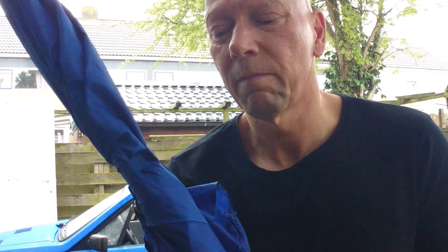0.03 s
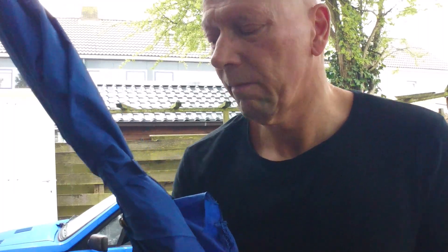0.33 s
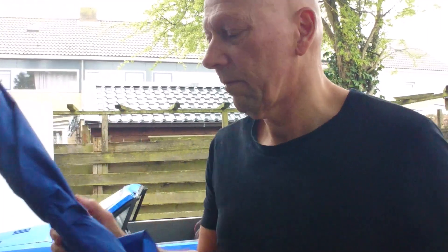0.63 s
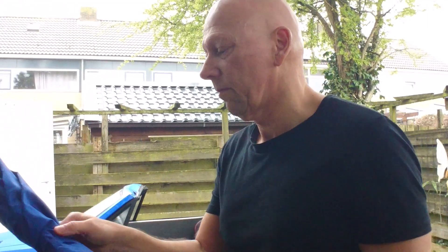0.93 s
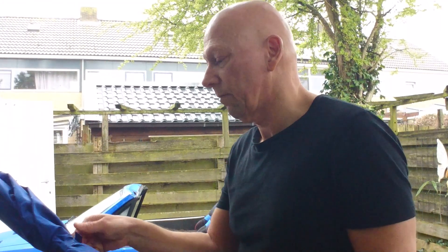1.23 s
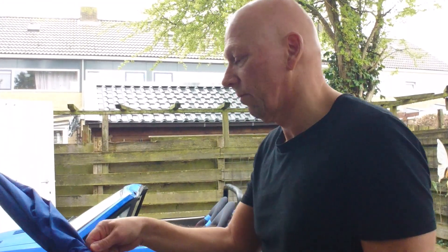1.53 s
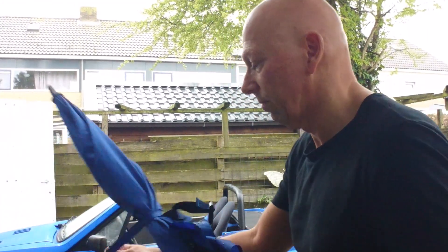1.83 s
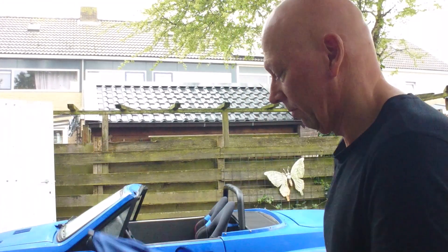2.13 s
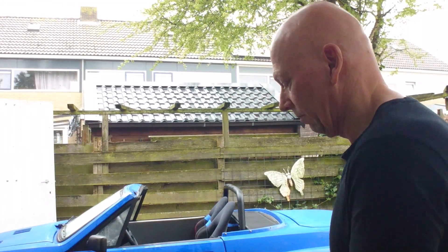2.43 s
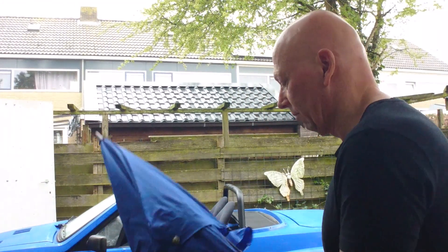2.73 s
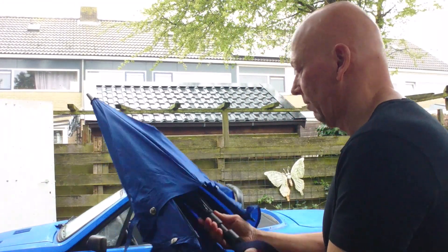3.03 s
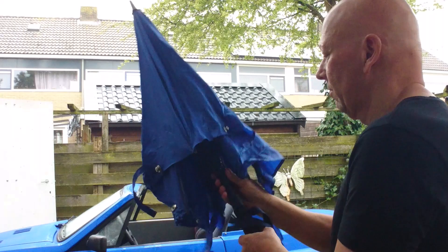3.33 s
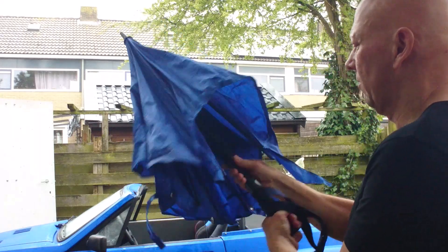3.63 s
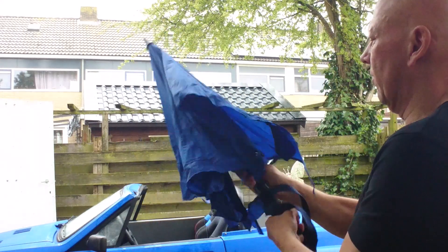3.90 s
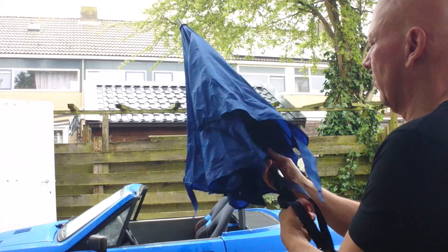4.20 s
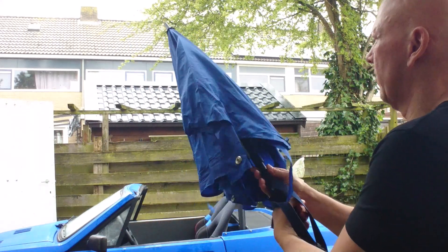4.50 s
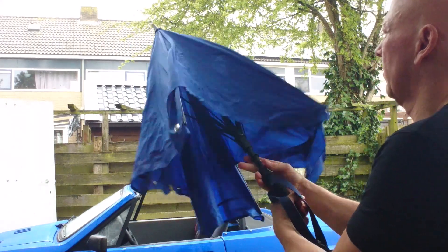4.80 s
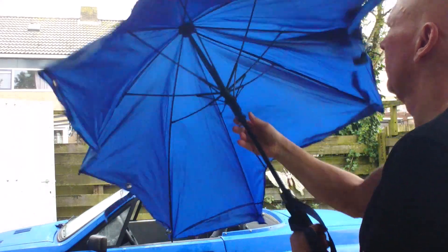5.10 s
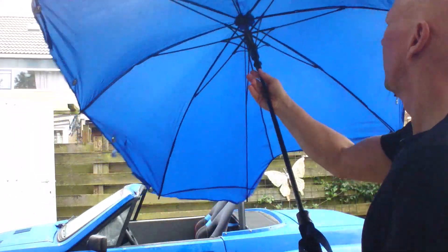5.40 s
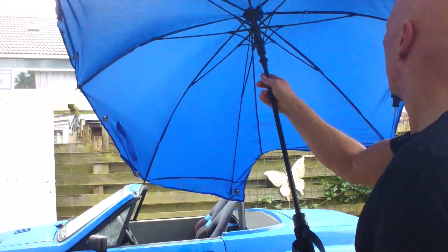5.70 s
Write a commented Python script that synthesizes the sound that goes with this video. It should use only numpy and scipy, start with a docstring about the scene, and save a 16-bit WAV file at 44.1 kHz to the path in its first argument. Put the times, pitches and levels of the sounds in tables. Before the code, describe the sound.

Over faint distant traffic, an umbrella clicks and clangs, its hook-and-loop strap tears free, and the nylon swishes until it snaps taut.

```python
"""Traffic drones far from a fenced garden. Close by, a little to the right, someone opens a big umbrella.
First come small clicks and a soft thump. The metal shaft is knocked and clangs twice, while the cloth
starts to rustle. The hook-and-loop strap rips loose, and the nylon swishes and flaps as it is shaken out
and spread. At last the slider latches on the shaft and the cloth snaps tight with a thump."""
import sys
import numpy as np
from scipy import signal
from scipy.fft import rfft, irfft, next_fast_len
from scipy.io import wavfile
from scipy.ndimage import map_coordinates

SR = 44100
rng = np.random.default_rng(int(sys.argv[2]) if len(sys.argv) > 2 else 0)


def wrap_up_sound(samples):
    """Save the sound to the file named by the first command line argument, as 16-bit audio."""
    columns = np.atleast_2d(samples).T
    # keep every value between -1 and 1, then stretch to whole-number steps
    tamed = np.clip(columns, -1, 1)
    steps = np.round(tamed * 32767).astype(np.int16)
    wavfile.write(sys.argv[1], SR, steps)


N = 253575

# A "fade" is the time to die away by 60 dB. "Pan" is left minus right, so below zero is to the right.
# How strong each noise is from low to high pitch: f/Hz, level/dB
RUMBLE_TONE = [(25, -31.5), (50, -4), (78, 5.5), (110, -5.5), (170, -7), (250, -20), (500, -31),
               (1000, -35.5)]  # far roads and stirred air
AIR_TONE = [(60, -12.5), (120, -9.5), (250, -18.5), (500, -23), (1000, -24.5), (2000, -33), (4500, -30.5),
            (7000, -48.5), (13500, -31), (16000, -45.5)]  # faint outdoor hiss
RATTLE_TONE = [(250, -31.5), (600, -5), (1400, -0.5), (2300, -1), (3300, -3), (4500, 0), (7000, -2.5),
               (10000, -1.5), (13500, 0), (16000, -4.5)]  # loose ribs after a click
CLATTER_TONE = [(70, -23.5), (150, -13), (320, -13), (450, -25), (680, -18.5), (950, -14.5), (1350, -15),
                (2000, -6.5), (3100, -10), (4600, -4), (7000, -15), (11000, -14), (13000, -8), (16000, -19)]  # ribs bouncing on the shaft
SWISH_TONE = [(300, -28), (900, -7.5), (1800, -1.5), (3000, 0), (4500, 1.5), (5800, 0.5), (7000, -4.5),
              (9000, -10.5), (16000, -18)]  # nylon sliding on nylon
HISS_TONE = [(3000, -39), (6500, -5.5), (9000, -6), (12000, -2.5), (13200, 0.5), (14500, -1), (16000, -4.5)]  # fine hiss of the weave
FLAP_TONE = [(90, 1), (180, -4.5), (350, 1), (500, -0.5), (700, -1.5), (1200, -4.5), (2200, -14),
             (5000, -42.5)]  # folds filling with air
STRAP_TONE = [(250, -23), (500, -14), (820, -14), (1000, -3.5), (1300, -8), (1600, -8), (2200, -10),
              (3500, -7), (5500, -6), (9000, -9), (13500, -4.5), (16000, -12)]  # hooks tearing loose
# Where the sounds sit between the ears: f/Hz, pan/dB
FAR_PAN = [(50, -1.5), (150, -10), (1000, -9), (6000, -3.5), (14000, -6.5)]
NEAR_PAN = [(60, -5.5), (200, -7), (700, -6.5), (1300, -7), (2400, -5), (4400, -1.5), (8000, -2.5),
            (11000, 1.5), (13200, 3), (15500, 2.5)]
CLATTER_PAN = [(100, -11), (200, -13.5), (380, -13.5), (700, -4.5), (1300, -9), (2400, -4.5), (4400, -2),
               (8000, -2), (13500, 4)]
# How alike a noise is in both ears: f/Hz, likeness (1 = the same)
LIKENESS = [(60, 0.9), (130, 0.75), (290, 0.67), (640, 0.59), (1410, 0.26), (3100, 0.052), (6820, 0.014),
            (15000, -0.086)]
# A far motor growing louder: t/s, f/Hz, level/dB
MOTOR_PATH = [(0, 169, -81.5), (3.2, 171.7, -73.5), (4.2, 178.7, -67), (4.8, 179, -60.5), (5.75, 178, -58)]
# The tones in its hum: multiple of the pitch, level/dB
MOTOR_TONES = [(1, 3.5), (2, -13), (3, -29), (4, -11)]
# Clicks of slider, rib tips and folds: t/s, level/dB, f/Hz, width/octaves, fade/s, rattle offset/dB
CLICKS = [(0.3405, -47, 14000, 0.23, .009, -12), (0.456, -45, 4100, 1.5, .017, -15),
          (0.461, -53, 1870, 0.15, 0.035, -15), (0.478, -42, 1850, .3, .02, -16),
          (1.089, -23, 14000, 1.3, 0.0027, -20), (1.092, -29, 9750, 5.5, 0.0051, -7),
          (1.175, -47, 2200, 1.5, 0.023, -8), (1.516, -29, 11000, 2.5, 0.0046, -7),
          (1.574, -35, 12000, 2.5, 0.0041, -12), (2.7507, -37, 13600, 0.45, .0055, -17),
          (2.831, -40, 4700, 0.71, 0.0098, -20), (3.8585, -14.5, 2300, 1.1, 0.0037, -15),
          (4.599, -32.5, 2540, 0.39, 0.013, -20), (5.169, -39.5, 368, 0.5, 0.035, -25),
          (5.2412, -29, 9000, 1.4, 0.0057, -14), (5.265, -33, 5060, 1.7, 0.0093, -6),
          (5.3168, -36.5, 1000, 2.5, .012, -5), (5.4996, -22.5, 2300, 1.1, 0.017, -13),
          (5.5103, -29, 3484, 0.67, 0.025, -11), (5.545, -38.5, 704, 1.5, 0.018, -15)]
# Jolts to the cloth: t/s, level/dB, rise/s
JOLTS = [(0.46, -10.5, 0.011), (1.173, -9.5, 0.07), (1.279, -9, 0.052), (1.325, -29, 0.064),
         (4.384, -18, 0.037), (5.503, -3.5, 0.0042)]
# The cloth's drum-like tones: f/Hz, level/dB, fade/s, pan/dB
CLOTH_TONES = [(53, -22, 0.19, -5), (83.6, -25, 0.15, -1), (114, -24.5, 0.08, -14), (180, -40.5, 0.14, -11),
               (260, -35, 0.088, -7), (327.5, -38.5, 0.12, -10)]
# Knocks on the shaft: t/s, clatter level/dB, clatter hold/s, clatter fade/s, ring level/dB, grip (0-1)
KNOCKS = [(0.577, -15, 0.012, 0.15, 1.5, 0), (1.4545, -26.5, 0.0038, 0.15, -9, 1)]
# Ringing tones of shaft and frame: f/Hz, level/dB, fade/s, pan/dB, change under a firm grip/dB
SHAFT_TONES = [(62, -38, .35, 0, 0), (103, -31, .2, -3, -8), (188, -46, .2, -16, -1),
               (262, -46, .26, -15, 0), (305, -43, .22, -16, 0), (339, -37, .13, -18, 6),
               (385, -54, .1, -14, 16), (480, -55, .11, -8, 17), (535, -56, .1, 5, 16),
               (850, -49, .08, -10, 8), (1130, -44, .08, -14, 3), (1599, -38.5, .33, -12, -6),
               (1943, -28.5, .29, -7, -1), (2333, -27.5, .35, -13, -4.5), (2804, -31, .11, -3, -8),
               (2854, -21, .13, -3, -8), (3610, -35.5, .56, -9, -16), (3858, -31, .14, -2, -8),
               (4143, -28, .12, 0, -7), (4297, -17, .12, 0, -3.5), (4927, -32, .12, -4, -4),
               (5178, -28, .125, -3, -7), (7900, -33, .14, 0, -10), (9372, -33, .18, 3, -6)]
# Swings of the umbrella: t/s, level/dB, rise/s, hold/s, fade/s
SWINGS = [(0.6, -50, 0.053, 0.14, .8), (1.12, -51, 0.061, 0.39, 0.68), (1.61, -47.5, 0.064, .03, 2.6),
          (2.41, -51, 0.036, .01, .5), (4.31, -45, .09, .17, 1.1), (4.67, -40.5, .09, .04, 1.4),
          (5.25, -46, 0.085, .01, .35), (5.52, -53.5, .1, .15, 1)]
# Movements of the cloth: t/s, level/dB, rise/s, hold/s, fade/s, hiss offset/dB, flap offset/dB
CLOTH_MOVES = [(0.95, -63, 0.045, 0.16, 0.66, -0.5, -9.5), (1.15, -59.5, 0.025, 0.022, 0.2, 1, -1.5),
               (1.268, -67, 0.012, 0.042, .4, 2, -1), (1.688, -58.5, 0.018, 0.12, 1.24, -0.5, -5),
               (1.937, -47.5, 0.029, 0.011, 0.75, -1, -12), (2.109, -49.5, 0.062, .01, .5, -1, -8),
               (2.22, -53, 0.043, 0.12, 0.78, 1, -5.5), (2.391, -47.5, 0.036, .01, 0.52, -2.5, -10),
               (2.498, -49, .1, 0.036, 0.74, -1, -7.5), (2.788, -55, 0.044, 0.12, 0.47, -0.5, -9),
               (3.018, -58, .08, 0.12, 1.2, -2.5, -6.5), (3.231, -54, 0.028, 0.022, 2.36, 0, -11),
               (3.49, -65.5, .05, .03, 1.6, -3, -4.5), (3.698, -51, 0.083, 0.14, 1.5, 1, -11.5),
               (3.928, -51, 0.037, 0.022, 1.13, 0.5, -5.5), (4.1, -56.5, 0.026, 0.034, .7, -1.5, -10),
               (4.268, -57, 0.064, 0.045, 1.4, -3, -3.5), (4.593, -53.5, 0.023, .13, 0.65, -2, -11),
               (4.682, -46.5, 0.29, 0.059, 0.95, 2, -15.5), (5.038, -50.5, 0.089, 0.058, 1.4, 1, -3),
               (5.246, -40, 0.027, 0.0059, 0.16, 2, -5), (5.29, -45.5, 0.024, 0.02, 0.39, 0.5, 0.5),
               (5.498, -63.5, 0.012, 0.043, 0.49, -5, 5.5), (5.59, -70, 0.025, 0.018, .7, -1, 8.5)]
# Bunches of hooks letting go: t/s, level/dB
HOOK_BURSTS = [(1.592, -30.5), (1.607, -38), (1.618, -30), (1.637, -37), (1.6463, -28.5), (1.657, -26.5),
               (1.661, -27.5), (1.666, -28), (1.673, -27), (1.680, -28)]
# How long the garden echoes: f/Hz, fade/s
ECHO_FADES = [(200, 0.68), (2000, 0.43), (6000, 0.4), (14000, 0.36)]

PING_DB, PING_DB_PER_OCTAVE = -0.5, -8.5  # the wider a click's range of pitches, the less it pings
PULL_START_S, PULL_FREE_S = 1.585, 1.685  # the strap is pulled ever harder until it comes free
PULL_DB, PULL_GROWS_DB_PER_S, PULL_FADE_S = -34, 150, 0.065  # its rasp: peak, growth, dying away
TOP_HZ = 15950


def amp(db):
    """Turn decibels into a number to multiply by."""
    return 10 ** (np.asarray(db) / 20)


def unit(x):
    """Scale a sound to an average power of 1."""
    return x / np.sqrt(np.mean(x ** 2) + 1e-20)


def along(points, hz):
    """Look up a table's value at any pitch."""
    f, v = np.transpose(points)
    return np.interp(np.log(hz + 1), np.log(f + 1), v)


def curves(rows):
    """Join a table's points in time: one curve for each later column."""
    s, *cols = np.transpose(rows)
    return [np.interp(np.arange(N) / SR, s, c) for c in cols]


def wobble(rate):
    """A smooth curve through `rate` random values a second."""
    return map_coordinates(rng.standard_normal(int(N * rate / SR) + 4), [np.arange(N) * rate / SR])


def filtered(x, response):
    """Turn each pitch in x up or down by response(hz)."""
    size = x.shape[-1]
    m = next_fast_len(size + 4096)
    return irfft(rfft(x, m) * response(np.fft.rfftfreq(m, 1 / SR)), m)[..., :size]


def sides(pan_db):
    """Left and right volume for a pan."""
    return amp(np.array([[.5], [-.5]]) * pan_db)


def rush(spectrum, pan, size=N, drive=1):
    """Stereo noise, alike in both ears in the bass but not in the treble; drive makes it rough."""
    def mix(hz):
        turn = np.arccos(np.clip(along(LIKENESS, hz), -1, 1)) / 2
        return amp(along(spectrum, hz)) * np.array([np.cos(turn), np.sin(turn)])
    mid, side = filtered(drive * rng.standard_normal((2, size)), mix)
    return unit(filtered(np.array([mid + side, mid - side]), lambda hz: sides(along(pan, hz))))


def fade(t, fade_s):
    """Die away by 60 dB in fade_s seconds."""
    return amp(-60 * t / max(fade_s, 1e-3))


def ring(t, hz, db, fade_s, pan_db, attack):
    """One dying tone; high tones are more out of step between the ears."""
    lag = np.array([[.5], [-.5]]) * min(hz / 1500, np.pi / 2)
    tone = np.sqrt(2) * np.sin(2 * np.pi * hz * t + lag)
    return amp(db) * sides(pan_db) * tone * fade(t, fade_s) * (1 - np.exp(-t / attack))


def add(track, s, sound):
    """Mix a sound in at time s."""
    part = track[:, round(s * SR):][:, :sound.shape[1]]
    part += sound[:, :part.shape[1]]


def traffic():
    """Far roads rumble under a low, wavering drone, the hum of one motor and a faint hiss of air."""
    motor_hz, motor_db = curves(MOTOR_PATH)
    turns = np.cumsum(motor_hz * (1 + 0.0083 * wobble(6.6))) / SR
    hum = unit(sum(amp(db) * np.sin(2 * np.pi * round(k) * turns) for k, db in MOTOR_TONES))
    motor = amp(motor_db + 2.5 * wobble(12)) * hum
    drone_hz = 53.5 + 1.9 * wobble(7.7)
    drone = amp(-60.5 + wobble(5.4)) * unit(np.sin(2 * np.pi * np.cumsum(drone_hz) / SR))
    roads = amp(-63) * rush(RUMBLE_TONE, FAR_PAN)
    air = amp(-62.5) * rush(AIR_TONE, FAR_PAN)
    return sides(-1.2) * drone + sides(-2.5) * motor + roads + air


def ribs(x, depth_db):
    """The many thin ribs make some high pitches louder and others softer."""
    grid = np.arange(0, SR / 2, 70)
    ripple = rng.standard_normal(len(grid)) * np.clip(grid / 3000, 0, 1)
    return filtered(x, lambda hz: amp(depth_db * np.interp(hz, grid, ripple)))


def clicks():
    """A small part snaps with a crack and a ping around one pitch, then the loose ribs rattle."""
    out, t = np.zeros((2, N)), np.arange(SR // 5) / SR
    grid = np.geomspace(40, SR / 2, num=60)
    for s, db, hz, octaves, fade_s, rattle_db in CLICKS:
        hump_db = -10 * np.log10(1 + (np.log2(grid / hz) / octaves) ** 4)  # loudest around hz
        noise = rush(np.column_stack([grid, hump_db]), NEAR_PAN, size=len(t))
        shape = fade(t, fade_s)
        crack = unit(shape * noise) * np.sqrt(np.mean(shape ** 2))
        ping_db = PING_DB + PING_DB_PER_OCTAVE * octaves
        ping = ring(t, hz, ping_db, fade_s, along(NEAR_PAN, hz), attack=.0001)
        rattle = unit(ribs(rush(RATTLE_TONE, NEAR_PAN, size=len(t)), depth_db=2.5))
        rattle_s = .17 if hz < 5000 else .04  # deep clicks shake the whole frame, bright ones one tip
        rattle *= amp(rattle_db) * (1 - np.exp(-t / 0.0014)) * fade(t, rattle_s)
        bass_cut = signal.butter(2, min(hz / 3, 700), "highpass", fs=SR)  # small parts give little bass
        add(out, s, amp(db) * signal.lfilter(*bass_cut, crack + ping + rattle))
    return out


def thumps():
    """A jolt makes the cloth boom like a slack drum."""
    out, t = np.zeros((2, N)), np.arange(SR // 2) / SR
    for s, db, rise in JOLTS:
        for hz, level, fade_s, pan in CLOTH_TONES:
            add(out, s, ring(t, hz, level + db, fade_s, pan, attack=rise))
    return out


def shaft_clangs():
    """Each knock bounces the ribs against the tube, which rings; a firm grip dulls its high tones."""
    out, t = np.zeros((2, N)), np.arange(SR * 3 // 4) / SR
    for s, db, hold, fade_s, ring_db, grip in KNOCKS:
        bounces = amp(1.24 * wobble(1194)[:len(t)])
        noise = rush(CLATTER_TONE, CLATTER_PAN, size=len(t), drive=bounces)
        shape = (1 - np.exp(-t / 0.002)) * fade(np.maximum(t - hold, 0), fade_s)
        clatter = amp(db) * shape * unit(ribs(noise, depth_db=3.5))
        tube = sum(ring(t, hz, level + ring_db + grip * change, ring_s, pan, attack=0.0027)
                   for hz, level, ring_s, pan, change in SHAFT_TONES)
        add(out, s, clatter + tube)
    return out


def swells(rows):
    """The loudness of overlapping movements: each rises smoothly, holds and dies away."""
    now, power = np.arange(N) / SR, np.full(N, amp(-180))
    for s, db, rise, hold, fade_s in rows:
        rising = np.sin(np.pi / 2 * np.clip((now - s) / rise, 0, 1))
        falling = fade(np.maximum(now - s - rise - hold, 0), fade_s)
        power += (amp(db) * rising * falling) ** 2
    return np.sqrt(power)


def swings():
    """Each swing of the umbrella pushes a low rumble of air past the listener."""
    return amp(-3) * swells(SWINGS) * rush(RUMBLE_TONE, FAR_PAN)


def cloth_rustle():
    """Folds slide over each other in countless tiny slips; wide folds flap as they fill with air."""
    start, db, rise, hold, fade_s, hiss_db, flap_db = np.transpose(CLOTH_MOVES)
    moves = lambda extra_db: swells(zip(start, db + extra_db, rise, hold, fade_s))
    folds_db = .7 * wobble(45)  # folds catch and let go
    slips = amp(1.16 * wobble(2500) + 0.7 * wobble(300))  # single threads, and clumps of them
    swish = moves(0) * amp(folds_db + 3.5) * rush(SWISH_TONE, NEAR_PAN, drive=slips)
    hiss = moves(hiss_db) * amp(folds_db + 4.0) * rush(HISS_TONE, NEAR_PAN, drive=slips)
    flap_shape = moves(flap_db) * amp(1.2 * wobble(30) + 2)
    flap = flap_shape * rush(FLAP_TONE, NEAR_PAN, drive=amp(2.6 * wobble(250)))
    return swish + hiss + flap


def strap_rip():
    """Hook-and-loop tape tears with a growing, spiky rasp, and a burst when a bunch of hooks lets go."""
    bursts, t = np.zeros((1, N)), np.arange(SR // 10) / SR
    for s, db in HOOK_BURSTS:
        add(bursts, s, amp(db) * fade(t, 0.019)[None])
    now = np.arange(N) / SR
    growth_db = PULL_GROWS_DB_PER_S * np.minimum(now - PULL_FREE_S, 0)
    falling = fade(np.maximum(now - PULL_FREE_S, 0), PULL_FADE_S)
    rasp = (now > PULL_START_S) * amp(PULL_DB + growth_db) * falling
    return np.hypot(rasp, bursts) * rush(STRAP_TONE, NEAR_PAN, drive=amp(2.7 * wobble(3000)))


def garden_echo(x):
    """The fence and house walls scatter the sound back as a short echo."""
    hz, t, noise = signal.stft(rng.standard_normal((2, SR // 2)), SR, nperseg=256)
    dying = amp(-60 * t / along(ECHO_FADES, hz)[:, None])
    tail = signal.istft(noise * dying, SR, nperseg=256)[1]
    tail = np.pad(tail, ((0, 0), (SR // 100, 0)))  # arrives 10 ms late
    return signal.fftconvolve(x, tail / np.linalg.norm(tail[0]), axes=1)[:, :N]


def scene():
    """The umbrella, its weak echo, the air it stirs and the far traffic."""
    umbrella = shaft_clangs() + clicks() + strap_rip() + cloth_rustle() + thumps()
    return umbrella + amp(-17.5) * garden_echo(umbrella) + swings() + traffic()


def record(dry):
    """Round off the loudest peaks, then cut the deepest bass and the highest treble."""
    rounded = dry / (1 + (dry / .66) ** 6) ** (1 / 6)
    lean = signal.sosfilt(signal.butter(4, 40, "highpass", fs=SR, output="sos"), rounded)
    return filtered(lean, lambda hz: 1 / (1 + (hz / TOP_HZ) ** 140))


dry = scene()
out = record(dry)
wrap_up_sound(out)
```